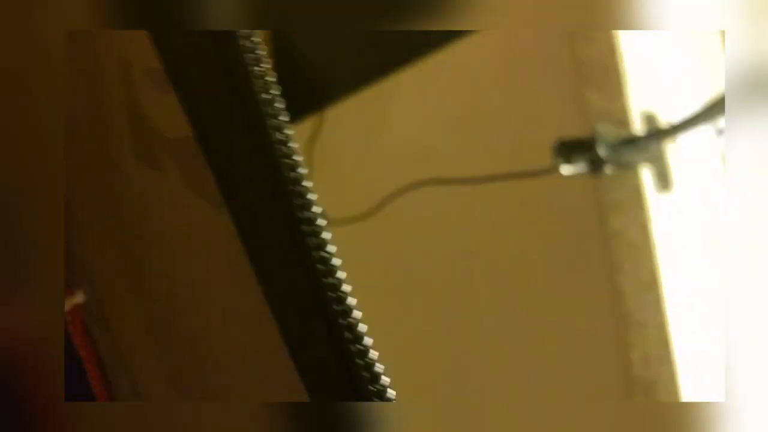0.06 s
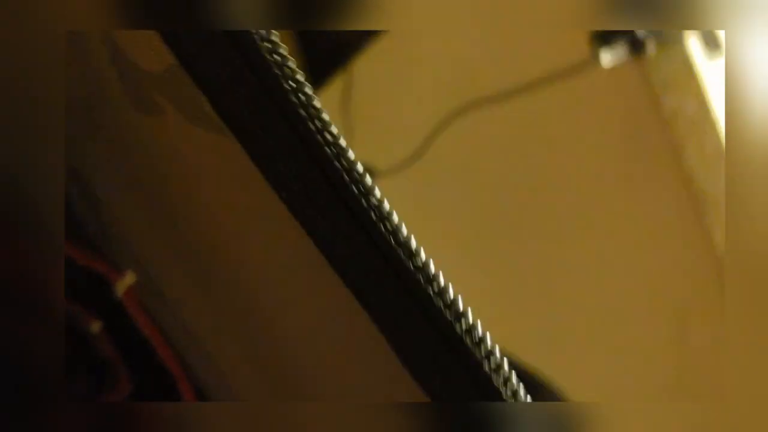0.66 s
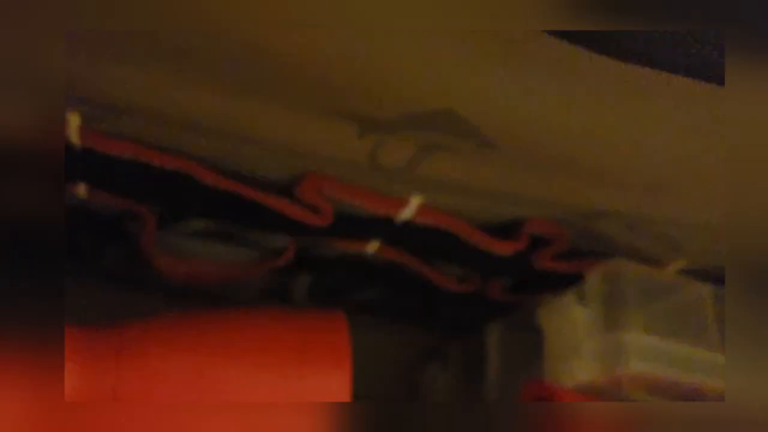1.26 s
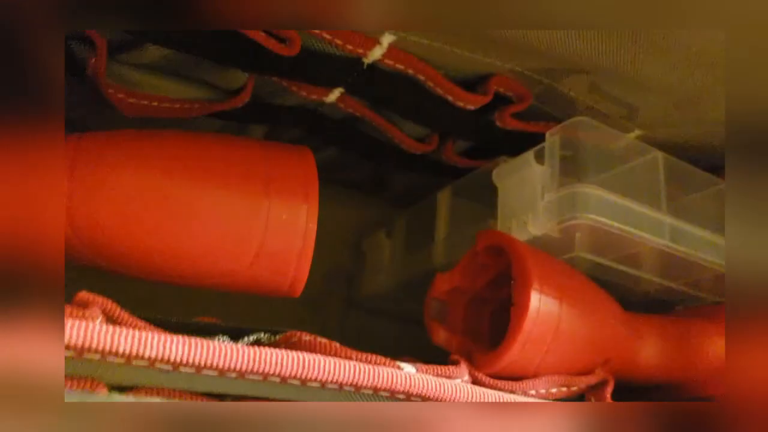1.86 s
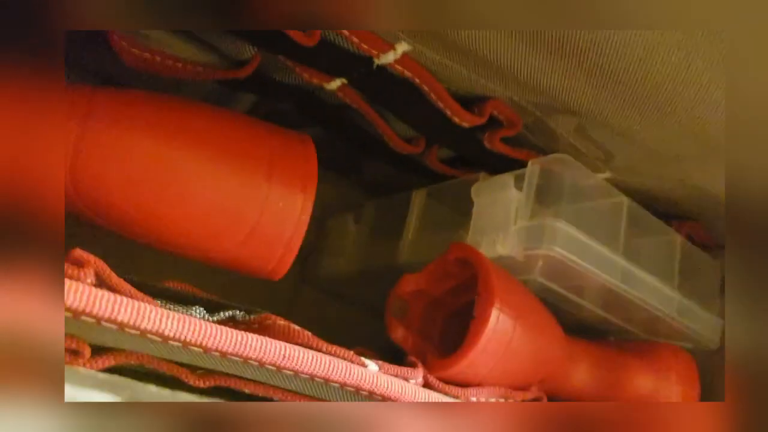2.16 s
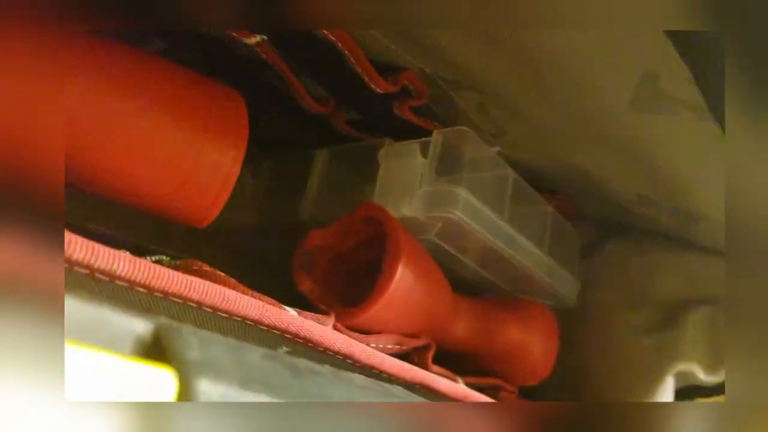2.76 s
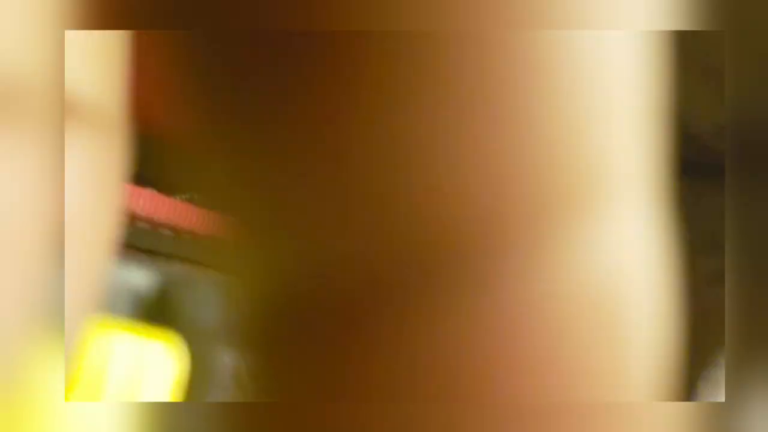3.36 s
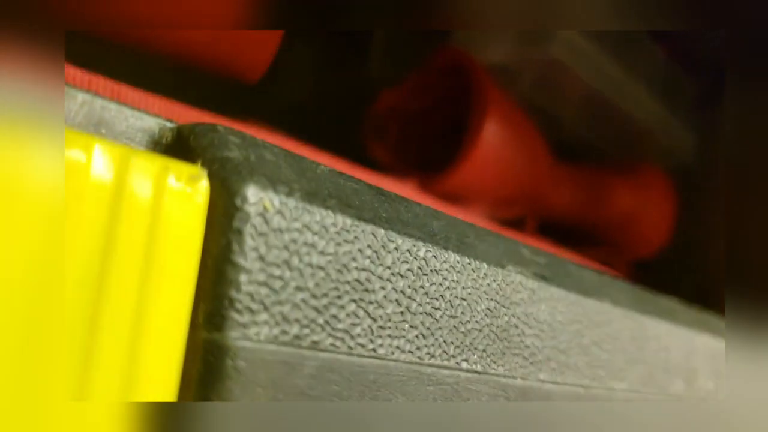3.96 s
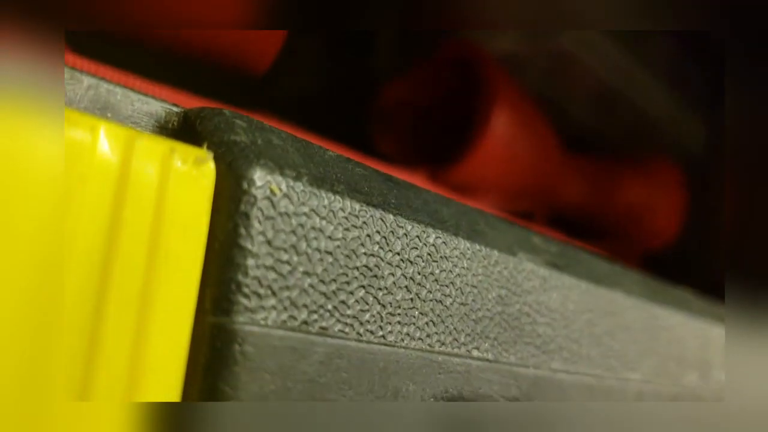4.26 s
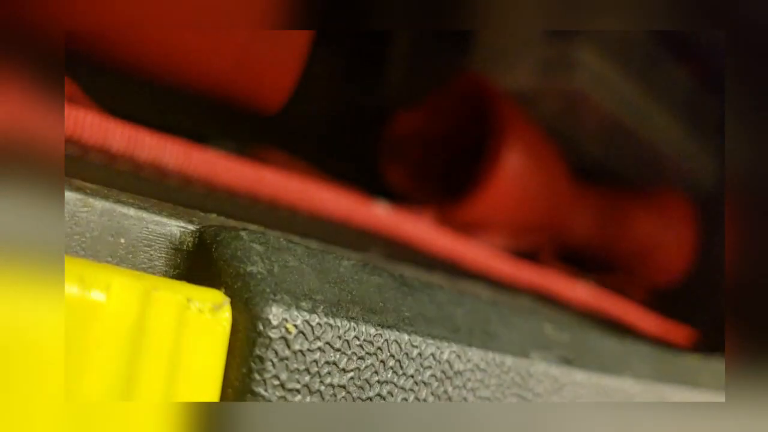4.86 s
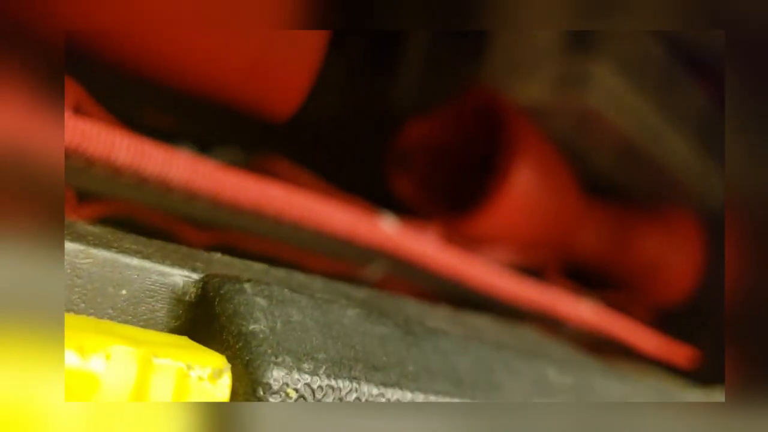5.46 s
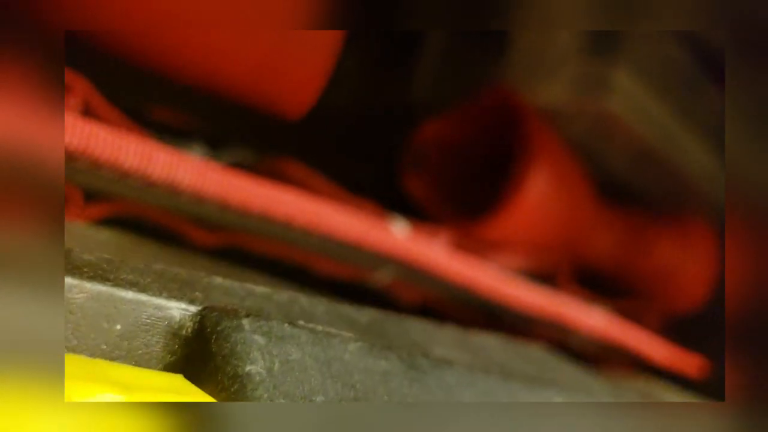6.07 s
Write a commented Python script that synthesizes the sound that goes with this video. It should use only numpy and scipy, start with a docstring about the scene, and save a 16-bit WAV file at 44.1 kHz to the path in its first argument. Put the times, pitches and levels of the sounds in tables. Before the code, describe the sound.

Soft nylon swishes, light taps and small creaks open as a microphone moves into a bag of tools. Fabric then drags roughly over it, mostly on the right, building to a loud thump near the middle. A run of dull knocks and sharp plastic clicks follows over hollow, cupped rubbing, then thins to lighter scrapes. Everything is very close, with a faint room drone behind.

```python
"""A hand-held camera pushes into a nylon tool bag and moves among plastic tools and boxes.
First the cloth swishes through the air, mostly to the left port, with a few brushes, taps and creaks.
From 2.2 s it drags over the case at the right port, catching threads; the hardest bump lands at 2.75 s.
From 3.15 s a finger cups that port and the rasp turns hollow, while hard things knock and click.
After 4.5 s the bumps die away and lighter drags carry on. A quiet room drones behind it all."""
import sys
import numpy as np
from scipy import signal
from scipy.fft import rfft, irfft
from scipy.io import wavfile

SR = 44100
rng = np.random.default_rng(int(sys.argv[2]) if len(sys.argv) > 2 else 0)


def pcm_store(signal):
    """Save signal as 16-bit PCM."""
    levels = np.round(np.clip(np.atleast_2d(signal), -1, 1) * 32767)
    wavfile.write(sys.argv[1], SR, levels.astype(np.int16).T)


N = 269010
T = np.arange(N) / SR

# Cloth dragging over the case. Each row: fastest moment, rise and fall in seconds, rasp level in dB,
# then pressing body (before its trim) and fibre grit, both in dB relative to the rasp.
CASE_DRAGS = [(0.383, 0.012, 0.033, -39.5, 6.5, -8.5), (0.465, 0.023, 0.093, -51.5, 7.5, -0.5),
              (0.585, 0.083, 0.082, -35.5, -5, -8.5), (0.7, .08, 0.041, -49, -3, -7),
              (1.165, 0.11, 0.057, -62, -13, 1.5), (1.289, 0.12, 0.097, -51, -7.5, 0),
              (1.82, 0.031, 0.048, -62, 4, -17), (1.876, 0.028, .03, -60, -12, 3.5),
              (1.95, .03, 0.045, -71.5, -2, 17), (2.047, 0.055, 0.06, -76, 5, 13),
              (2.215, 0.0084, 0.069, -44, -18, 8.5), (2.26, 0.041, 0.11, -34.5, -7.5, -5),
              (2.34, 0.041, .04, -42.5, -0.5, -8), (2.41, 0.057, .1, -45, 2.5, -8),
              (2.515, 0.069, 0.075, -34.5, -3, -13.5), (2.61, 0.23, 0.14, -46, 5, -7.5),
              (2.71, 0.079, 0.1, -29.5, -1.5, -6.5), (2.76, 0.018, 0.031, -19.5, 4.5, -4),
              (2.783, 0.02, .015, -24, 1, -2.5), (2.815, .02, 0.056, -47, 8, -7),
              (2.925, 0.066, 0.24, -43.5, -3.5, 0.5), (3.015, 0.07, 0.062, -33, -2.5, -8.5),
              (3.17, 0.094, 0.035, -44.5, 1, -0.5), (3.265, 0.044, 0.037, -38, 5, -20),
              (3.35, 0.098, 0.11, -41.5, 0.5, -5), (3.48, 0.14, .12, -38, 2.5, -4),
              (3.595, 0.12, .09, -41, -1.5, -6), (3.71, 0.2, 0.052, -47.5, -0.5, 0.5),
              (3.785, 0.036, 0.12, -48, 1, 0), (3.92, 0.053, 0.03, -41.5, 4, -8),
              (4.065, 0.093, 0.092, -50, -1.5, -0.5), (4.3, 0.23, 0.24, -58, 5, -9),
              (4.402, 0.099, 0.054, -52, -0.5, -5), (4.535, 0.097, 0.16, -38, 1, -6),
              (4.68, 0.12, 0.097, -40.5, -1, -3), (4.825, 0.067, 0.088, -50, -0.5, -4.5),
              (5.015, 0.059, 0.13, -49.5, -5, 1.5), (5.1, 0.11, 0.12, -53.5, 0, -0.5),
              (5.305, 0.072, 0.1, -41.5, 0, -2), (5.555, 0.1, 0.1, -60, 4, 1.5),
              (5.685, 0.083, 0.16, -61, -2.5, 3.5), (5.84, 0.12, 0.11, -66.5, -8.5, 10.5),
              (6.0, 0.032, 0.12, -51.5, 4.5, 3), (6.095, .09, .1, -42, 0.5, -2.5)]
# Cloth sliding on cloth. Each row: fastest moment, rise and fall in seconds, hiss level on the left
# in dB, then flapping panel and airy sheen, both in dB relative to the hiss.
CLOTH_SWISHES = [(0.01, 0.078, 0.14, -53, -10, 1.5), (0.14, 0.12, 0.16, -54.5, -15, 9),
                 (0.385, .015, 0.064, -54, -3.5, 0), (0.603, 0.096, 0.11, -51.5, 0.5, -5),
                 (0.69, 0.14, 0.049, -53, -8, -3), (1.07, 0.071, 0.14, -53.5, -19, 4.5),
                 (1.18, 0.11, 0.094, -46.5, -11.5, 1), (1.285, 0.088, 0.094, -36, -11, -4),
                 (1.37, .03, 0.15, -53, -12, -8), (1.52, 0.11, 0.083, -56.5, -14, 4),
                 (1.705, 0.21, 0.033, -47.5, -20, 2), (1.85, 0.31, 0.055, -65, -9, 0),
                 (1.952, 0.054, 0.03, -44.5, -19.5, 0.5), (2.043, 0.043, 0.041, -52.5, -17, 1.5),
                 (2.255, 0.071, 0.082, -34.5, -11, -1.5), (2.53, 0.13, 0.24, -51.5, -5, -3),
                 (2.748, 0.11, 0.052, -33, -4.5, -3), (3.0, 0.16, 0.087, -44.5, -7, 2.5),
                 (3.07, 0.057, 0.062, -46.5, -18, 1), (3.28, .13, 0.27, -49, -18, -1),
                 (3.55, .1, 0.13, -57, -1, 0), (3.68, 0.14, 0.062, -54.5, -3, -1),
                 (3.8, .03, 0.055, -61, -20, -1), (3.94, .04, 0.087, -53.5, -11, -2),
                 (4.059, 0.076, 0.061, -43.5, -12, 1), (4.19, 0.049, 0.079, -48, -4, 1),
                 (4.335, 0.038, 0.055, -50, -12, 0), (4.53, 0.15, 0.22, -52.5, -12, -1),
                 (4.86, .05, 0.07, -60, -13, 2), (5.15, .15, 0.23, -64.5, -20, 0),
                 (5.54, .04, 0.045, -62, -22, 0), (5.635, 0.03, .14, -64, -19, 0)]
# Bumps against the case. Each row: start in seconds, level in dB, starting pitch in Hz.
CASE_BUMPS = [(0.3733, -29, 239), (0.3819, -20.5, 244), (0.394, -27, 90), (0.4001, -26, 573),
              (0.4594, -30.5, 570), (1.18, -40.5, 120), (1.81, -43.5, 110), (1.93, -46, 100),
              (2.5396, -21.5, 644), (2.755, -1.5, 213), (2.7554, -8, 483), (3.0995, -28, 452),
              (3.172, -27.5, 433), (3.2072, -31, 300), (3.2322, -20, 580), (3.3552, -24.5, 318),
              (3.4824, -15, 414), (3.5077, -17, 358), (3.6012, -22.5, 1160), (3.7732, -19, 320),
              (3.839, -24, 408), (3.9485, -17.5, 1650), (3.9529, -4.5, 363), (4.0113, -32.5, 384),
              (4.129, -16, 850), (4.1325, -20.5, 590), (4.1842, -4, 364), (4.1846, -15.5, 970),
              (4.2684, -31, 300), (4.418, -37, 385), (4.5204, -4, 312), (4.7966, -40, 320),
              (5.3277, -31.5, 215)]
# Hard edges and snagged threads. Each row: start in seconds, left and right level in dB, ring in Hz.
EDGE_CLICKS = [(0.3794, -55, -37, 1340), (0.3996, -62, -40, 1640), (0.4627, -60, -44, 2070),
               (0.5314, -65, -35.5, 3560), (.579, -51, -34, 1640), (1.1807, -37, -38.5, 1600),
               (2.3183, -36, -35.5, 6030), (2.3568, -59, -35.5, 2370), (2.3877, -32.5, -34.5, 4270),
               (2.4505, -63, -36, 1950), (2.4983, -58, -31, 1690), (2.5403, -43, -23.5, 2070),
               (2.7566, -32, -21, 2286), (3.017, -45, -25.5, 2370), (3.2334, -62.5, -34, 1470),
               (3.483, -47, -31, 2370), (3.5098, -26, -26.5, 4170), (3.7271, -65, -39, 9000),
               (3.7756, -56, -39, 4360), (3.909, -60, -38, 4400), (3.947, -23.5, -17.5, 2260),
               (4.1288, -40, -28, 2800), (4.1845, -50, -25.5, 3500), (4.267, -54, -43, 1360),
               (4.5216, -43, -27.5, 2320), (4.6365, -60, -31, 2480), (4.661, -60, -37, 8100),
               (4.7343, -49, -35.5, 2120), (4.961, -74, -48, 8100), (5.046, -57, -43, 8300),
               (5.5507, -68, -46, 4420), (5.8274, -69, -54.5, 2580), (5.876, -70, -52, 3860),
               (6.029, -68, -41, 4250)]
# Groans and zips of taut cloth and loaded plastic. Each row: start and length in seconds, pitch in Hz,
# left and right level in dB.
STRAIN_CREAKS = [(0.311, 0.14, 1408, -81, -64.5), (0.448, 0.19, 356, -84, -43.5),
                 (0.514, 0.23, 3500, -59, -48), (0.542, 0.12, 2580, -67, -42.5),
                 (1.236, .11, 516, -65, -52.5), (1.241, 0.098, 3980, -41, -66),
                 (1.848, 0.036, 1950, -71, -55.5), (1.962, 0.2, 1450, -84.5, -65),
                 (2.235, 0.081, 1135, -58, -38.5), (2.758, 0.029, 467, -50, -36),
                 (3.522, 0.086, 780, -59, -41)]
# Modes of thin plastic walls. Each row: pitch in Hz, decay in seconds, relative level in dB.
WALL_MODES = [(1675, .0008, -10), (4720, 0.0015, -2), (7150, 0.0014, -15.5), (12400, 0.00046, -1.5),
              (14450, 0.00042, -0.5)]
# Tone curves of the nylon, the rubbed case, a finger-cupped port and the room.
# Each row: frequency in Hz, relative level in dB.
NYLON_EQ = [(300, -16), (600, -19.5), (1100, -17), (1500, -15.5), (2300, -7.5), (3200, -2), (4200, 3),
            (6100, -2.5), (7300, -0.5), (8700, -8.5), (11000, -8), (12800, -2), (15600, -3.5)]
CASE_EQ = [(40, -20.5), (90, -6), (180, -1), (400, 0), (750, -3), (1200, 0.5), (2100, -1), (2900, -7),
           (4300, -9), (5400, -13), (6400, -17), (9300, -21.5), (12500, -22), (15600, -23)]
CUPPED_EQ = [(1000, 1.5), (2000, -3), (2600, 4), (3150, -1.5), (4000, 5), (4900, 5), (6000, 0.5),
             (6900, -1), (8000, 11.5), (9800, 1), (11200, 8), (12800, 2.5), (15500, 5)]
ROOM_EQ = [(25, -12.5), (60, -0.5), (120, -7), (170, -13.5), (260, -16), (500, -22.5), (1500, -26.5),
           (4000, -22.5), (7300, -23), (8800, -27), (15000, -25.5)]


def drag(rasp, body, grit, body_hz=700, grit_hz=3000, body_trim_db=-1.5, cupped_from_s=3.15,
         snag_even_db=-54.5, snag_slope=0.44, leak_db=-39, shake_db=-22):
    """The weave sticks and slips on the case: pressing brings out body, snagging threads crackle."""
    grip = undb(2 * wander(260) + wander(45))  # fast judder, slower catching
    friction = through_case(slips(14000, 2.32) * grip)
    friction = bag_echo(friction, echo_db=-10.5, lag_s=0.001432, sway=0.21)
    snags = through_case(slips(230, 4.7))
    cupped = np.clip((T - cupped_from_s) / 0.17, 0, 1)

    def at_port(x):
        """The open port crossfades to the hollow sound of the cupped one."""
        return unit((1 - cupped) * unit(x) + cupped * unit(colour(x, CUPPED_EQ)))

    low = unit(band(band(friction, "low", body_hz), "high", 55, order=1))
    mid = at_port(band(friction, "band", [body_hz, grit_hz]))
    fibres = at_port(band(friction, "high", grit_hz)) * undb(2 * wander(70))
    crackle = at_port(band(snags, "high", 5030, order=2))
    # Slow drags catch threads, fast ones run smooth: with grit below snag_even_db the crackle leads.
    snagging = (grit / undb(snag_even_db) + 1e-9) ** -snag_slope
    top = (fibres + snagging * crackle) / np.sqrt(1 + snagging ** 2)
    right = low * body * undb(body_trim_db) + mid * rasp + top * grit
    # The far port gets a dull shaking through the case and only a trace of the rasp.
    shaking = unit(band(rng.standard_normal(N), "band", [35, 160], order=2)) * body
    return np.array([undb(leak_db) * right + undb(shake_db) * shaking, right])


def bumps(sag=0.32, contact_s=0.0006, contact_cycles=0.27, scuff_db=-27,
          ring_hz=185, ring_s=0.0278, ring_db=-31, far_db=-22):
    """Damped thuds sag in pitch as the contact relaxes; the surfaces scuff and the case hums briefly."""
    right, t = np.zeros(N), np.arange(SR // 7) / SR
    for start, db, hz in CASE_BUMPS:
        swell_s = contact_s + contact_cycles / hz  # soft bumps are low and long
        push = t / swell_s * np.exp(1 - t / swell_s)
        thud = np.sin(2 * np.pi * np.log1p(sag * hz * t) / sag)
        scuff = undb(scuff_db) * through_case(rng.standard_normal(len(t)))
        ring = undb(ring_db) * damped_sine(t, ring_hz, ring_s)
        add(right, start, undb(db) * (push * (thud + scuff) + ring))
    right = band(right, "high", 62, order=2)
    left = undb(far_db) * band(right, "low", 190, order=2)
    return np.array([left, right])


def swish(hiss, panel, sheen, panel_hz=450, hiss_hz=2800, sheen_hz=9500):
    """The fine weave hisses; in firm strokes the whole panel sounds too. Each port has its own grain."""
    folds = undb(1.4 * wander(90))
    ports = []
    for top_db, panel_db in [(0, 0), (-8, -2)]:  # left, right
        weave = colour(slips(16000, 2.2) * folds, NYLON_EQ)
        weave = bag_echo(weave, echo_db=-12, lag_s=0.000798, sway=0.1205)
        treble = unit(band(weave, "high", hiss_hz))
        top = hiss * band(treble, "low", sheen_hz) + sheen * band(treble, "high", sheen_hz)
        flap = panel * unit(band(weave, "band", [panel_hz, hiss_hz]))
        ports.append(top * undb(top_db) + flap * undb(panel_db))
    return np.array(ports)


def clicks(crack_s=0.00023, ring_s=0.00042, ring_at_db=-38.5, ring_growth=0.39, level_window_s=0.003):
    """A crack rings the plastic walls: airborne on the left, joined by the touched spot on the right."""
    out, t = np.zeros((2, N)), np.arange(SR // 50) / SR
    mode_hz, mode_s, mode_db = np.transpose(WALL_MODES)[:, :, None]
    window_gain = np.sqrt(level_window_s * SR / len(t))  # levels are rms as if packed into the window
    for start, left_db, right_db, spot_hz in EDGE_CLICKS:
        spot_s = ring_s * undb(max(left_db, right_db) - ring_at_db) ** ring_growth  # harder rings longer
        detune = 1 + 0.09 * rng.standard_normal(mode_hz.shape)
        crack = unit(rng.standard_normal(len(t)) * np.exp(-t / crack_s))
        walls = unit(np.sum(undb(mode_db) * damped_sine(t, mode_hz * detune, mode_s), axis=0))
        spot = unit(damped_sine(t, spot_hz, spot_s))
        left = walls + undb(-1) * unit(band(crack, "high", 3000, order=1))
        right = through_case(crack) + undb(-1) * spot + undb(-8) * walls
        for port, sound, db in zip(out, (left, right), (left_db, right_db)):
            click = unit(band(sound, "high", 1000, order=2))
            add(port, start, undb(db) * window_gain * click)
    return out


def creaks(width=0.13):
    """Taut cloth and plastic creak under load: fine stick-slip in one narrow resonance."""
    out = np.zeros((2, N))
    for start, length, hz, left_db, right_db in STRAIN_CREAKS:
        progress = np.clip((T - start) / length, 0, 1)
        load = np.sqrt(np.abs(np.sin(np.pi * progress)))
        ring = band(slips(4000, 1.7), "band", [hz * (1 - width), hz * (1 + width)], order=2)
        out += undb([[left_db], [right_db]]) * load * unit(ring)
    return out


def room(air_db=-69.5, hum_hz=120, hum_db=-74.5):
    """A low drone and mains hum sit in the centre, with a faint separate hiss on each side."""
    common, left, right = (unit(colour(rng.standard_normal(N), ROOM_EQ)) for _ in range(3))
    drone = band(common, "low", 220)
    hiss = np.array([band(left, "high", 240), undb(-3) * band(right, "high", 220)])
    hum = np.sqrt(2) * np.sin(2 * np.pi * hum_hz * T) * undb(hum_db + 1.3 * wander(2.7))
    return undb(air_db) * (drone + hiss) + hum


def strokes(table, roundness, edge_db=17.5):
    """Three layer envelopes: each stroke gains edge_db over its rise and loses it over its fall."""
    power = np.zeros((3, N))
    for peak, rise, fall, db, *relative_db in table:
        near = slice(max(int((peak - 3 * rise) * SR), 0), int((peak + 3 * fall) * SR))
        from_peak = np.maximum((peak - T[near]) / rise, (T[near] - peak) / fall)
        swell = undb(-edge_db * from_peak ** roundness)
        layer_gains = undb(db + np.array([0, *relative_db]))
        power[:, near] += np.outer(layer_gains, swell) ** 2
    return np.sqrt(power)


def jolts(rasp_db=-35, body_db=-30.5, grit_db=-42, settle_s=0.019):
    """Every bump shifts the cloth a little: drag envelopes that settle fast, in proportion to the bump."""
    settling, t = np.zeros(N), np.arange(SR // 4) / SR
    for start, db, _ in CASE_BUMPS:
        add(settling, start, undb(db) * np.exp(-t / settle_s))
    return np.outer(undb([rasp_db, body_db, grit_db]), settling)


def slips(per_second, spread_db):
    """Fibres let go at random: many tiny impulses and a few large ones."""
    size = undb(spread_db * np.minimum(rng.exponential(size=N), 5))
    return unit((rng.random(N) < per_second / SR) * size * rng.choice([-1, 1], N))


def through_case(x):
    """The case colours what it carries to the port."""
    return unit(colour(x, CASE_EQ))


def bag_echo(x, echo_db, lag_s, sway):
    """A bag wall throws the sound back; as it sways, the hollow colour shifts."""
    lag = lag_s * np.exp(sway * wander(5))
    return unit(x + undb(echo_db) * np.interp(T - lag, T, x))


def damped_sine(t, hz, decay_s):
    """One struck resonance dying away."""
    return np.exp(-t / decay_s) * np.sin(2 * np.pi * hz * t)


def wander(per_second):
    """Random drift with rms 1."""
    steps = rng.standard_normal(N // 20)
    return unit(np.interp(T * per_second, np.arange(len(steps)), steps))


def colour(x, curve, size=4096):
    """Minimum-phase EQ along a tone curve, built from its cepstrum."""
    hz, db = np.transpose(curve)
    grid_hz = np.maximum(np.fft.rfftfreq(size, 1 / SR), 1)
    gain = undb(np.interp(np.log(grid_hz), np.log(hz), db))
    cepstrum = irfft(np.log(gain))
    cepstrum[1:size // 2] *= 2
    cepstrum[size // 2 + 1:] = 0
    impulse = irfft(np.exp(rfft(cepstrum)))
    return signal.fftconvolve(x, impulse)[:len(x)]


def band(x, kind, hz, order=3):
    """Butterworth filter."""
    return signal.sosfilt(signal.butter(order, hz, kind, fs=SR, output="sos"), x)


def add(track, start_s, sound):
    """Mix a sound into a track."""
    start = max(int(start_s * SR), 0)
    track[start:start + len(sound)] += sound[:N - start]


def undb(db):
    """Decibels to gain."""
    return 10 ** (np.asarray(db) / 20)


def unit(x):
    """Scale to rms 1."""
    return x / np.sqrt(np.mean(x ** 2))


def scene(left_lag_samples=14):
    """The mix at both ports; the action is on the right, so the left hears it a little later."""
    rasp, body, grit = np.hypot(strokes(CASE_DRAGS, roundness=1.45), jolts())
    # Part of each drag reaches the air as hiss, panel sound and sheen.
    airborne = np.array([undb(-16.5) * grit, undb(-30) * rasp, undb(-18) * grit])
    hiss, panel, sheen = np.hypot(strokes(CLOTH_SWISHES, roundness=1.67), airborne)
    left, right = swish(hiss, panel, sheen) + drag(rasp, body, grit) + bumps() + clicks() + creaks()
    left = np.pad(left, (left_lag_samples, 0))[:N]
    return np.array([left, right]) + room()


def record(dry, top_hz=15900):
    """The camera flattens peaks at full scale, then cuts the top steeply."""
    high_cut = signal.ellip(10, 0.2, 70, top_hz, fs=SR, output="sos")
    return signal.sosfilt(high_cut, np.clip(dry, -1, 1))


dry = scene()
out = record(dry)
pcm_store(out)
```